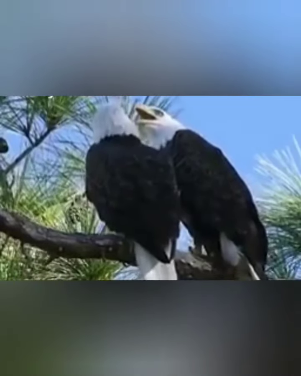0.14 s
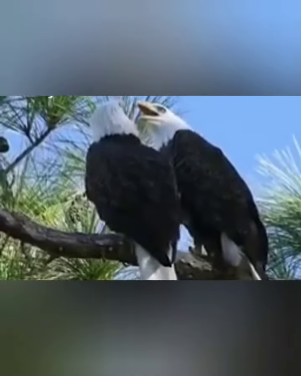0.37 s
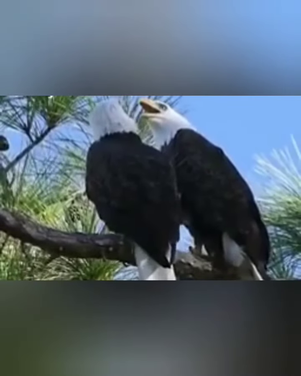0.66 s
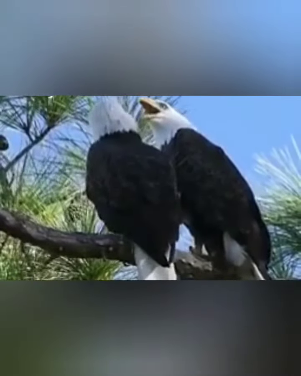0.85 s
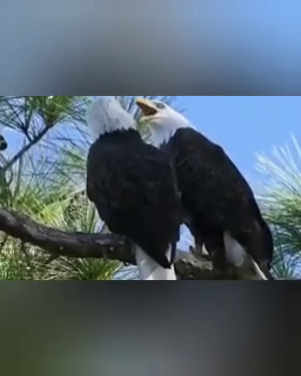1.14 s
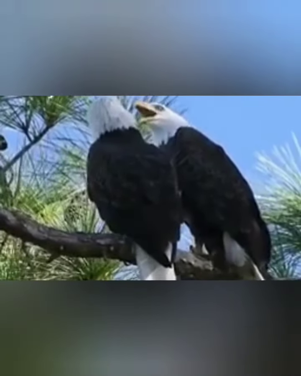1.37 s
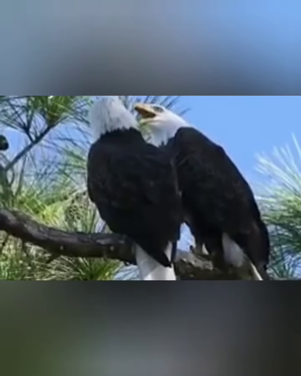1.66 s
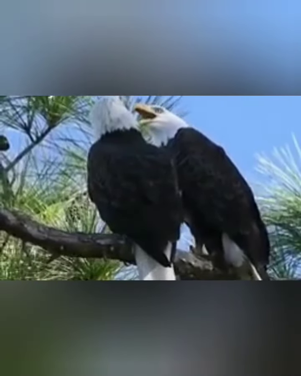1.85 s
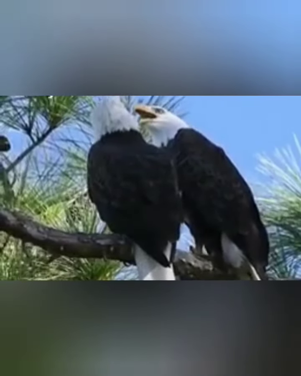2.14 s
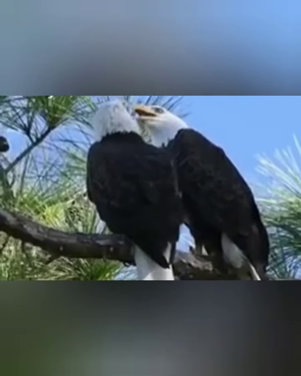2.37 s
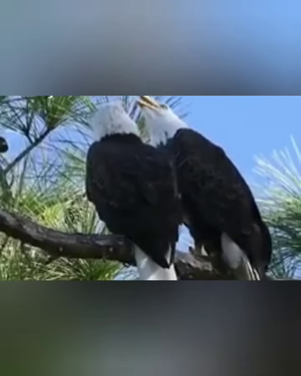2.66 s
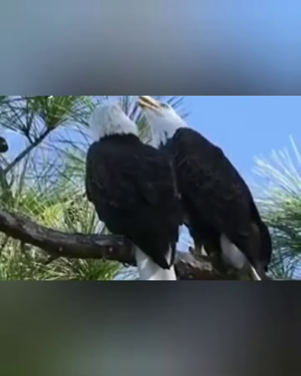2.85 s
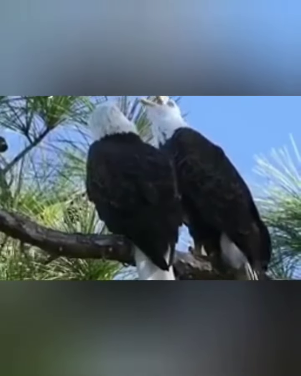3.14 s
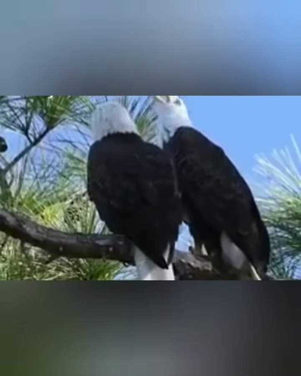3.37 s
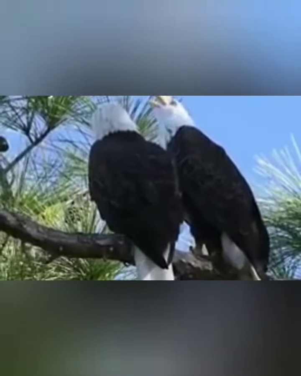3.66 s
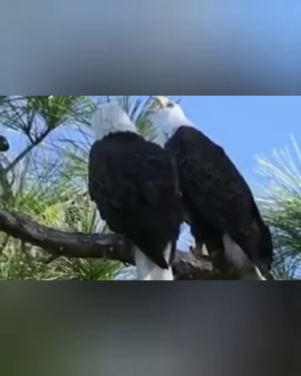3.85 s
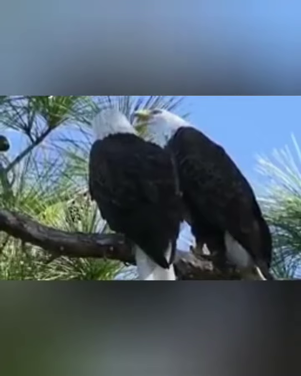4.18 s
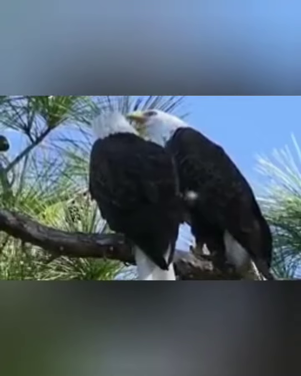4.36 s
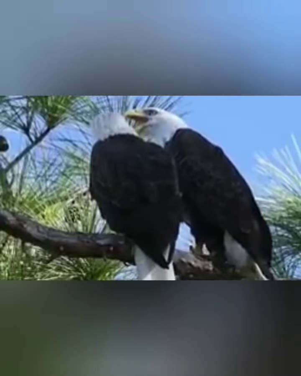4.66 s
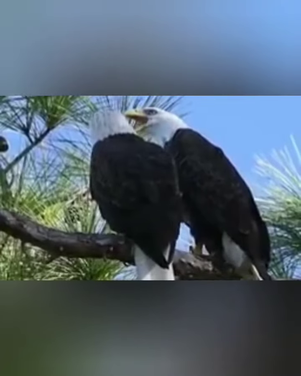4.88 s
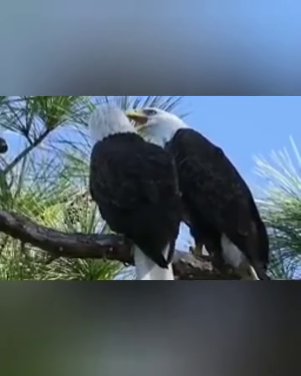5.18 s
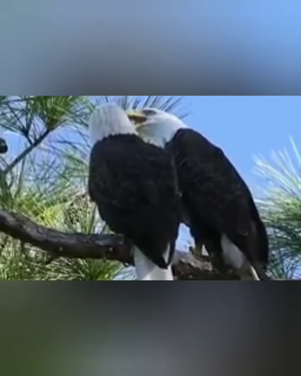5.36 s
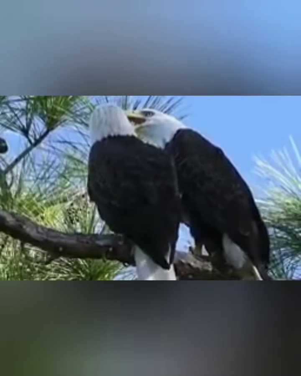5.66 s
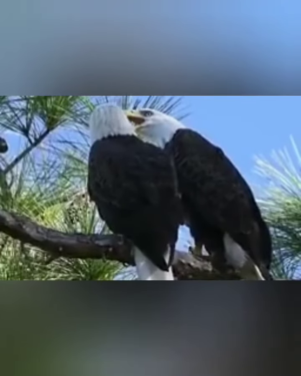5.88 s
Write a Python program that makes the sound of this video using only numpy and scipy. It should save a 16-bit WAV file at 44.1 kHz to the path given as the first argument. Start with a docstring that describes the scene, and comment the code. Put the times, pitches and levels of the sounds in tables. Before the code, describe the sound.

A bald eagle calls outdoors in several runs of short, thin piping notes. Faint pipes come first, then a loud burst falls into chatter and a low cluck. High squeaks and cracking yelps follow, then more pipes, another chattering fall and a last fading run. Trees return a diffuse echo over low steady air rumble, faint machine hum and far traffic, heard from a moderate distance.

```python
"""A bald eagle calls in runs of thin, piping notes: gliding whistles with harmonics, rougher ones more frayed.
Pipes lie in the middle register, chatter in the low one, yelps flip from low to middle, squeaks top the range.
Some notes start with a rasping catch or a crack of mixed registers; two falling runs end in low clucks made of
harmonics and puffs of air. Trees return the calls as random echoes; filtered noise and sines make the air,
far traffic and machine hum behind."""
import sys
import numpy as np
from scipy import signal
from scipy.fft import rfft, irfft
from scipy.io import wavfile

SR = 44100
rng = np.random.default_rng(int(sys.argv[2]) if len(sys.argv) > 2 else 0)


def materialize(psi):
    """Save the field psi as 16-bit PCM at rate SR to the path in sys.argv[1].

    A 1-D psi becomes a single channel; in a 2-D psi each row is a channel.
    """
    bounded = np.clip(np.atleast_2d(psi).T, -1, 1)
    quanta = np.round(bounded * 32767).astype(np.int16)
    wavfile.write(sys.argv[1], SR, quanta)


N = 265482
TIME_S = np.arange(N) / SR

# top-register squeaks: (time [s], length [s], pitch [Hz], level [dB], hissing octave [dB re note],
# lead-in rasp level [dB]); both levels before the trims in piping() and hissing()
SQUEAKS = [ (.005, 0.083, 4170, -51.5, -3, -64), (2.371, 0.038, 4390, -36.5, 1, -53.5),
           (2.495, 0.048, 4363, -33, -26, -58.5), (3.85, 0.048, 4610, -30, -10.5, -46.5),
           (3.968, 0.042, 4610, -30, -9, -42.5), (4.071, 0.04, 4540, -35.5, -6, -57.5),
           (5.294, 0.035, 4470, -36.5, -6, -51), (5.409, 0.041, 4526, -34, -6, -50.5), ]


def amp(db):
    """Decibels to gain."""
    return 10 ** (np.asarray(db) / 20)


def evened(x):
    """Scales to rms 1."""
    return x / np.sqrt(np.mean(x ** 2) + 1e-20)


def add(mix, start_s, sound):
    """Mixes a sound in at a time, or at the very start if that is negative."""
    part = mix[max(round(start_s * SR), 0):][:len(sound)]
    part += sound[:len(part)]


def coloured(x, points):
    """Filters by (frequency [Hz], gain [dB]) points, joined on a log frequency axis."""
    hz, db = np.transpose(points)
    grid_hz = np.fft.rfftfreq(len(x), 1 / SR)
    gain_db = np.interp(np.log(grid_hz + 1), np.log(hz + 1), db)
    return irfft(rfft(x) * amp(gain_db), len(x))


def noise(points):
    """Noise of rms 1 with the given spectrum."""
    return evened(coloured(rng.standard_normal(N), points))


def drift(rate_hz):
    """Random wandering of rms 1, mostly slower than the rate."""
    grid_hz = np.fft.rfftfreq(N, 1 / SR)
    return evened(irfft(rfft(rng.standard_normal(N)) / (1 + (grid_hz / rate_hz) ** 4), N))


def push(count, crest, start_db=-7, end_db=-8, rise_s=0.0052, fall_s=0.0023):
    """Air pressure of one note: a quick start, a swell to its crest (share of the length), a fade."""
    t = np.arange(count) / SR
    swell_db = np.interp(t / t[-1], [0, np.clip(crest, .05, .95), 1], [start_db, 0, end_db])
    edges = np.clip(np.minimum(t / rise_s, (t[-1] - t) / fall_s), 0, 1)
    return amp(swell_db) * np.sin(np.pi / 2 * edges)


def outdoor_air():
    """Steady rumble and hiss: noise with a fixed spectrum."""
    # (frequency [Hz], relative density [dB per Hz])
    air_spectrum = [(15, -37.5), (25, -18.5), (60, -8), (80, -3), (115, -1), (160, 2.5), (240, -0.5),
                    (290, -8), (600, -8.5), (800, -9), (1050, -14), (1500, -17), (2100, -20.5),
                    (3600, -22.5), (6900, -31), (8400, -31), (9600, -33.5), (11000, -35), (12500, -57),
                    (15000, -64.5)]
    return amp(-50.5) * noise(air_spectrum)


def far_traffic():
    """A distant roar: low noise that swells slowly."""
    # (frequency [Hz], relative density [dB per Hz])
    roar_spectrum = [(200, -14.5), (330, 13), (600, 9.5), (850, -25), (1400, -18.5), (3000, -35),
                     (10000, -65.5)]
    # (time [s], level [dB])
    roar_level = [(0, -80), (2, -59.5), (3.5, -59.5), (4.5, -59.5), (5.2, -52.5), (6.02, -58)]
    return amp(np.interp(TIME_S, *np.transpose(roar_level))) * noise(roar_spectrum)


def machine_hum(waver_hz=1.55, flutter_db=2):
    """Steady machine tones: sines that waver in pitch and level."""
    # (frequency [Hz], mean level [dB])
    hum_lines = [(137, -63.5), (154, -62.5), (179, -63), (233, -60), (317, -75), (349, -73), (479, -68),
                 (586, -68), (599, -65)]
    out = np.zeros(N)
    for hz, db in hum_lines:
        phase = 2 * np.pi * np.cumsum(hz + waver_hz * drift(2.644)) / SR
        out += amp(db + flutter_db * drift(4.0)) * np.sin(phase)
    return out


def scatter(t60_s, build_s):
    """Two seconds of random echoes, energy 1, that build up and die away."""
    t = np.arange(2 * SR) / SR
    decay = np.exp(-np.log(1000) * t / t60_s)
    tail = rng.standard_normal(len(t)) * decay * (1 - np.exp(-t / build_s))
    return tail / np.linalg.norm(tail)


def trees(x):
    """Single echoes, near-branch scatter, a blurred echo off the wood's edge and a long, fluttering tail."""
    # trunk and ground: (delay [s], level [dB])
    echoes = [(0.0147, -8), (0.0227, -16)]
    # colour of the long tail: (frequency [Hz], gain [dB])
    wood_colour = [(1000, -9.5), (2300, -1), (3050, -2), (3450, -3.5), (4500, -0.5), (6200, -4),
                   (6800, -2.5), (9000, 3)]
    # share sent to the wood as the head turns: (time [s], send [dB], extra treble [dB])
    wetness = [(0, 6.5, 2.5), (.7, 1, -0.5), (1.001, -1.5, -2), (1.599, -3.5, -0.5), (2.4, 1, -1.5),
               (2.67, 1.5, 8.5), (2.95, -0.5, -0.5), (3.401, -3, 0), (3.8, 2.5, 4.5), (4.3, 2, 2),
               (5.1, 0.5, 10), (5.8, 6, -1)]
    # band that the open beak beams forward: (frequency [Hz], gain [dB])
    treble_band = [(4500, -37.5), (5900, 2), (7200, 0.5), (8200, -13.5)]
    flutter, flutter_hz = 0.28, 110

    near = amp(-12) * scatter(t60_s=0.16, build_s=0.12)
    near[0] += 1  # direct sound
    for delay_s, db in echoes:
        add(near, delay_s, amp([db]))

    far = amp(-13) * scatter(t60_s=1.12, build_s=0.0036)
    add(far, 0.11, amp(-17) * scatter(t60_s=0.11, build_s=0.00069))  # edge of the wood
    add(far, 0.2, amp(-24.0) * scatter(t60_s=1.5, build_s=0.019))  # late swell from deeper in

    times_s, send_db, treble_db = np.transpose(wetness)
    treble_gain = amp(np.interp(TIME_S, times_s, treble_db))
    beamed = x + (treble_gain - 1) * coloured(x, treble_band)
    sent = beamed * amp(np.interp(TIME_S, times_s, send_db))
    tail = signal.fftconvolve(sent, coloured(far, wood_colour))[:N]
    return signal.fftconvolve(x, near)[:N] + tail * evened(1 + flutter * drift(flutter_hz))


def clucking(jitter=.014, breath=.3):
    """Low register: a falling, shaky stack of harmonics and puffs of air, shaped by the throat."""
    # (time [s], length [s], start pitch [Hz], end pitch [Hz], rms level [dB])
    clucks = [(1.978, 0.041, 672, 595, -47.5), (2.113, 0.028, 611, 569, -52.5),
              (5.226, 0.0278, 693, 581, -46.5)]
    # (frequency [Hz], gain [dB])
    throat = [(600, -40), (1250, -5), (1850, -3.5), (2500, -7), (3300, -16.5), (5000, -24.5), (9000, -50),
              (15000, -84)]
    out, shake = np.zeros(N), drift(240)
    for start_s, length_s, start_hz, end_hz, db in clucks:
        glide_hz = np.linspace(start_hz, end_hz, round(length_s * SR))
        count = len(glide_hz)
        wobble = 1 + jitter * shake[round(start_s * SR):][:count]
        phase = 2 * np.pi * np.cumsum(glide_hz * wobble) / SR
        pulses = evened(coloured(sum(np.cos(k * phase) for k in range(1, 10)), throat))
        puffs = evened(coloured((1 + np.cos(phase)) * rng.standard_normal(count), throat))
        add(out, start_s, amp(db) * evened((pulses + breath * puffs) * push(count, crest=0.3)))
    return out


def hissing(trim_db=-1, length_s=0.027, overlap_s=0.0034):
    """Leading into each squeak, air rasps through the tight syrinx until the whistle takes hold."""
    # (frequency [Hz], relative level [dB])
    lead_spectrum = [(2500, -28), (4200, -7), (5300, 7.5), (6000, -1), (6900, -20.5), (9000, -6.5),
                     (12500, -31.5), (15000, -61.5)]
    out, air = np.zeros(N), noise(lead_spectrum)
    count = round(length_s * SR)
    pressure = push(count, crest=0.75)
    for start_s, *_, lead_db in SQUEAKS:
        rasp = pressure * air[round(start_s * SR):][:count]
        add(out, start_s + overlap_s - length_s, amp(lead_db + trim_db) * rasp)
    return out


# The note generators yield (time [s], length [s], (start, middle, end pitch) [Hz], level before trim [dB],
# octave [dB re fundamental], crest [share of length], roughness); piping() sounds them.

def breaks():
    """Two registers modulate each other: sum, difference and octave tones make the voice crack."""
    # (time [s], length [s], low pitch [Hz], high pitch [Hz], level before trim [dB])
    cracks = [ (1.228, 0.0092, 2540, 3250, -38), (1.384, 0.01, 2506, 3167, -30.5),
              (1.529, 0.015, 2495, 3120, -41.5), (2.945, 0.015, 2463, 3040, -40),
              (3.32, 0.018, 2520, 2994, -44.5), (4.53, 0.031, 2590, 3060, -37),
              (4.662, 0.013, 2450, 3080, -44), ]
    # one per combination tone, lowest first: (level [dB re crack])
    tone_levels = (-9, -13, -16, -3, -9)
    octave_db, crest, rough = -32.5, 0.12, 0.31
    for start_s, length_s, low, high, db in cracks:
        tones_hz = [2 * low - high, 2 * high - low, 3 * low - high, low + high, 2 * high]
        for hz, tone_db in zip(tones_hz, tone_levels):
            yield start_s, length_s, np.full(3, hz), db + tone_db, octave_db, crest, rough


def catches():
    """The voice breaks downward at the start of a note: a short, often rasping tone that sags in pitch."""
    # (time [s], length [s], pitch [Hz], level before trim [dB], octave [dB re fundamental], roughness)
    catch_notes = [ (0.426, 0.018, 3020, -51, -40, 0.08), (0.976, 0.011, 3013, -32.5, 5, 0.93),
                   (1.085, 0.024, 3004, -34.5, 7.5, 0.96), (1.221, 0.02, 3210, -36, -4, 1.15),
                   (1.376, 0.025, 3140, -33.5, -5, 0.6), (1.528, 0.0097, 3220, -40, -1.5, 0.07),
                   (2.928, 0.012, 3440, -46, 0.5, 0.6), (3.024, 0.041, 4030, -43.5, -12, 0.42),
                   (4.39, 0.021, 2580, -40.5, -11.5, 0.47), (4.519, 0.024, 4080, -45, -21, 0.1),
                   (4.526, 0.04, 3133, -35, -12.5, 0.21), (4.662, 0.02, 3130, -41.5, -10, 0),
                   (4.81, 0.0081, 3050, -51, -7, 0.2), ]
    bend = np.array([1.02, 0.97, 1])  # start, middle, end
    for start_s, length_s, hz, db, octave_db, rough in catch_notes:
        yield start_s, length_s, hz * bend, db, octave_db, 0.23, rough


def squeaks(scoop=0.02, crest=0.37, rough=.27):
    """A tight whistle that starts flat and scoops up to its pitch."""
    bend = np.array([1 - scoop, 1, 1])
    for start_s, length_s, hz, db, octave_db, _ in SQUEAKS:
        yield start_s, length_s, hz * bend, db, octave_db, crest, rough


def yelps():
    """The pitch climbs two overlapping steps in the low register, then flips to the middle one."""
    # (time [s], low length [s], flip time [s], high length [s], low pitch [Hz], high pitch [Hz],
    # low level before trim [dB], high level before trim [dB], high octave [dB re fundamental],
    # high rise [share of pitch])
    yelp_notes = [ (2.522, 0.033, 2.561, 0.013, 2370, 3213, -30, -23, -31.5, -0.044),
                  (2.927, 0.03, 2.949, 0.022, 2354, 3046, -32.5, -28.5, -7, -0.008),
                  (3.318, .024, 3.337, 0.027, 2320, 3040, -35, -28.5, -10, 0.036),
                  (3.651, 0.019, 3.669, 0.047, 2305, 3120, -39.5, -29.5, -13, 0.093), ]
    step, low_rise = .12, 0.032  # shares of the low pitch: between steps, within each
    slur_s = 0.0034  # overlap of the steps
    low_crest, low_rough = 0.84, .2
    high_crest, high_rough = 0.35, .07
    climb = np.array([-.5, 0, .5])
    for start_s, low_s, flip_s, high_s, low_hz, high_hz, low_db, high_db, octave_db, rise in yelp_notes:
        half_s = low_s / 2
        first_hz = low_hz * (1 - step / 2 + low_rise * climb)
        second_hz = low_hz * (1 + step / 2 + low_rise * climb)
        yield start_s, half_s, first_hz, low_db, -12.5, low_crest, low_rough
        yield start_s + half_s - slur_s, half_s + slur_s, second_hz, low_db + 1.5, -12, low_crest, low_rough
        yield flip_s, high_s, high_hz * (1 + rise * climb), high_db, octave_db, high_crest, high_rough


def chatter():
    """Each low note snaps on and falls, with a faint second voice; lower is duller and smoother, softer duller."""
    # (time [s], length [s], middle pitch [Hz], level before trim [dB])
    chatter_notes = [ (0.42, 0.02, 2405, -46), (0.563, 0.024, 2336, -45.5), (0.707, 0.023, 2214, -52.5),
                     (0.956, 0.013, 2330, -45), (1.234, 0.033, 2594, -28), (1.258, 0.023, 2457, -30.5),
                     (1.385, 0.046, 2378, -28.5), (1.53, 0.045, 2358, -29), (1.685, 0.031, 2282, -30.5),
                     (1.834, 0.037, 2218, -32), (4.546, 0.034, 2522, -33), (4.669, 0.0475, 2392, -31.5),
                     (4.806, 0.035, 2330, -30), (4.955, 0.023, 2225, -31.5), (5.097, 0.023, 2203, -33.5), ]
    usual_hz, usual_db, usual_octave_db, usual_rough = 2422, -32, -7.5, 0.14
    octave_db_per_hz, octave_db_per_db, rough_per_hz = 0.0224, 1, 0.00047
    snap_s, snap_db, snap_pitch = 0.0097, -9.5, 1.04  # harsh onset: level and pitch re note
    under_pitch, under_db = .805, -26.5  # second voice: pitch and level re note
    bend, crest = np.array([1.03, 1, 0.98]), 0.38
    for start_s, length_s, middle_hz, db in chatter_notes:
        above_hz = middle_hz - usual_hz
        octave_db = usual_octave_db + octave_db_per_hz * above_hz + octave_db_per_db * (db - usual_db)
        rough = usual_rough + rough_per_hz * above_hz
        hz = middle_hz * bend
        yield start_s, length_s, hz, db, octave_db, crest, rough
        yield start_s, snap_s, snap_pitch * hz, db + snap_db, -1, crest, 0.8
        yield start_s, length_s, under_pitch * hz, db + under_db, -8.5, crest, usual_rough


def pipes(arch=0.018):
    """Each middle-register pipe is one gliding arch; both ends sag by a share of the pitch."""
    # (time [s], length [s], middle pitch [Hz], glide [share of pitch], level before trim [dB],
    # octave [dB re fundamental], crest [share of length], roughness [0-1])
    pipe_notes = [ (0.04, 0.043, 3407, -0.0059, -37.5, -14, 0.52, 0.54),
                  (0.159, 0.035, 3317, 0.03, -39, -9.5, 0.6, 0.26),
                  (0.29, 0.035, 3220, -0.022, -42.5, -9, 0.38, 0.36),
                  (0.969, 0.02, 3090, 0.0046, -30, -2.5, 0.22, 0.1),
                  (0.983, 0.041, 3173, -0.0093, -21.5, -3, 0.47, 0.03),
                  (1.021, 0.032, 3028, -0.059, -29.5, -18, 0.2, 0),
                  (1.098, 0.016, 3190, -0.027, -30, -5.5, 0.65, 0),
                  (1.111, 0.018, 3187, -0.014, -23, -2.5, 0.3, 0.11),
                  (2.273, 0.038, 3424, 0.021, -47.5, -18, 0.27, 0.32),
                  (2.598, 0.027, 3170, 0.018, -22, -34, 0.8, 0.13),
                  (2.627, 0.046, 3213, 0.06, -23, -22.5, 0.2, 0.07),
                  (2.67, 0.029, 3358, -0.039, -28.5, -17.5, 0.21, 0.22),
                  (2.971, 0.01, 3060, 0.011, -23, -27, 0.35, 0.08),
                  (3.03, 0.031, 3377, 0.029, -33, -18, 0.27, 0.36),
                  (3.365, 0.019, 3100, -0.0023, -33, -15.5, 0.4, 0.04),
                  (3.379, 0.02, 3390, 0.033, -43, -22, 0.42, 0.37),
                  (3.739, 0.033, 3500, 0.077, -34, -13, 0.81, 0.18),
                  (3.754, 0.041, 3695, 0.004, -31.5, -9, 0.24, 0.11),
                  (4.07, 0.063, 3720, -0.064, -38.5, 0.5, 0.18, 0.48),
                  (4.197, 0.041, 3575, -0.00059, -32, -9.5, 0.42, 0.16),
                  (4.245, 0.043, 3010, 0.04, -32.5, -12.5, 0.37, 0.08),
                  (4.284, 0.041, 3126, -0.004, -28, -15, 0.97, 0),
                  (4.328, 0.031, 3470, 0.044, -40, -14, 0.28, 0),
                  (4.391, 0.049, 3088, -0.0056, -31, -11, 0.83, 0.17),
                  (5.184, 0.037, 3480, 0.032, -37.5, -20, 1, 0.11),
                  (5.519, 0.047, 3615, -0.019, -35.5, -8.5, .3, 0.34),
                  (5.648, 0.045, 3510, 0.021, -36.5, -11, 0.28, 0.18),
                  (5.779, 0.033, 3370, 0.027, -37, -14, 0.54, 0.48),
                  (5.912, 0.038, 3270, 0.023, -43.5, -15, 0.47, 0.2), ]
    for start_s, length_s, hz, glide, db, octave_db, crest, rough in pipe_notes:
        bend = np.array([1 - arch - glide / 2, 1, 1 - arch + glide / 2])
        yield start_s, length_s, hz * bend, db, octave_db, crest, rough


def piping(notes):
    """The syrinx whistles; roughness shakes its pitch, smears each partial into a band and adds turbulent air."""
    # turbulent air: (frequency [Hz], relative level [dB])
    rasp_spectrum = [(1200, -15), (2200, 16), (3300, 8.5), (5600, 2.5), (6800, -7), (8500, -29.5),
                     (10600, -23), (12500, -32.5), (15000, -60.5)]
    # top-register hiss: (frequency [Hz], relative level [dB])
    sizzle_spectrum = [(4000, -21), (5800, 4.5), (7000, -27), (8400, 22.5), (9500, 15), (10400, -13),
                       (12500, -21.5), (15000, -55)]
    # band of the thin top overtone: (frequency [Hz], gain [dB])
    whisper_band = [(7500, -28), (8300, -10), (9700, -2), (10900, -0.5), (11600, -22.5), (13000, -38.5)]
    trim_db, rasp_db, third_db, sizzle_db, whisper_db = 0.5, -9, -14, -10.5, -58  # third: re octave
    quaver, jitter = 0.04, 0.006  # slow and fast pitch shake at roughness 1, shares of pitch
    smear, smear_hz, fray = 0.12, 480, .028
    beat_hz, second_side, pulsing = 110, 2.26, 0.5
    beak_hz, top_register_hz = 7300, 4050

    out, whisper = np.zeros(N), np.zeros(N)
    slow, fast, shiver = drift(130), drift(1200), drift(350)
    chaos = [drift(k * smear_hz) + 1j * drift(k * smear_hz) for k in range(1, 4)]
    beat = np.exp(2j * np.pi * np.cumsum(beat_hz * (1 + .3 * drift(20.21))) / SR)
    rasp = noise(rasp_spectrum)
    sizzle = noise(sizzle_spectrum) * (1 + pulsing * beat.real)

    for start_s, length_s, pitches_hz, db, octave_db, crest, rough in notes:
        middle_hz = pitches_hz[1]
        u = np.linspace(0, 1, round(length_s * SR))
        span = round(start_s * SR) + np.arange(len(u))
        arch_hz = np.polyval(np.polyfit([0, .5, 1], pitches_hz, 2), u)
        hz = arch_hz * (1 + rough * (quaver * slow[span] + jitter * fast[span]))
        phase = 2 * np.pi * np.cumsum(hz) / SR

        # the two sides of the syrinx slip apart, sharp or flat, and beat
        twin = second_side * rough
        apart = beat[span] ** rng.choice([-1, 1])
        pure = np.sqrt(2 * np.clip(1 - rough, 0, 1) / (1 + twin ** 2))

        voice = rough ** 2 * amp(rasp_db) * rasp[span]
        for k, partial_db in enumerate([0, octave_db, octave_db + third_db], 1):
            beak_gain = 1 / np.sqrt(1 + (k * middle_hz / beak_hz) ** 32)  # stops the highest overtones
            frayed = min(fray * (amp(-partial_db) - 1), .5)  # weak overtones are noisier
            tone = pure * (1 + twin * apart ** k)
            swing = tone + (smear * rough + frayed) * chaos[k - 1][span]
            voice += amp(partial_db) * beak_gain * (swing * np.exp(1j * k * phase)).real
        if middle_hz > top_register_hz:  # octave frays into pulsing hiss
            voice += amp(sizzle_db + octave_db) * sizzle[span]

        pressure = push(len(u), crest)
        add(out, start_s, amp(db + trim_db) * pressure * voice)
        # third-harmonic whisper follows roughness, not note level
        add(whisper, start_s, np.sqrt(abs(rough)) * pressure * shiver[span] * np.cos(3 * phase))
    return out + amp(whisper_db) * coloured(whisper, whisper_band)


def scene():
    """The eagle among the trees, over air, traffic and hum."""
    background = outdoor_air() + far_traffic() + machine_hum()
    notes = [*pipes(), *chatter(), *yelps(), *squeaks(), *catches(), *breaks()]
    eagle = piping(notes) + hissing() + clucking()
    return (trees(eagle) + background)[None]


def record(dry):
    """A gentle colour with a narrow, deep dip in the treble near 7.6 kHz, and the recorder's band limit."""
    # (frequency [Hz], gain [dB])
    final_colour = [(20, 1), (6900, -0.5), (7250, -6.5), (7600, -39), (8050, -8.5), (9300, -11), (16000, 6)]
    heard = coloured(dry[0], final_colour)
    low_pass = signal.firwin(511, 15700, window=("kaiser", 9), fs=SR)  # cutoff in Hz
    return signal.oaconvolve(heard, low_pass, "same")[None]


dry = scene()
out = record(dry)
materialize(out)
```